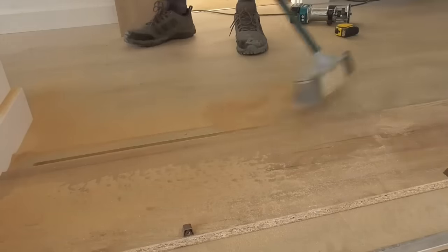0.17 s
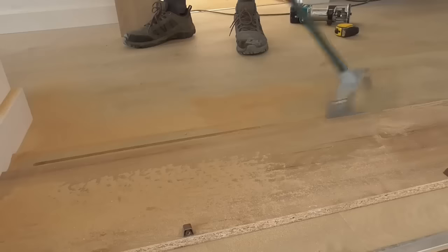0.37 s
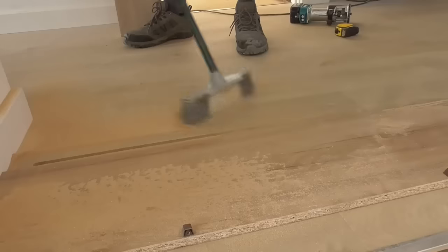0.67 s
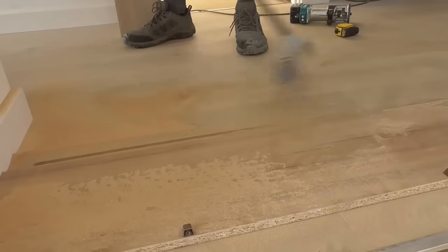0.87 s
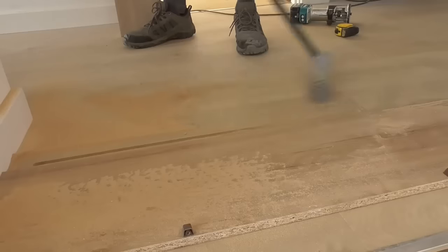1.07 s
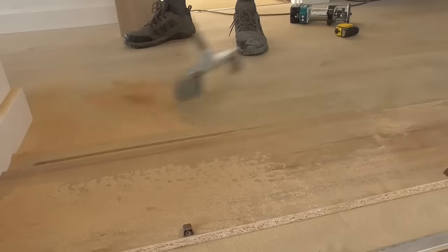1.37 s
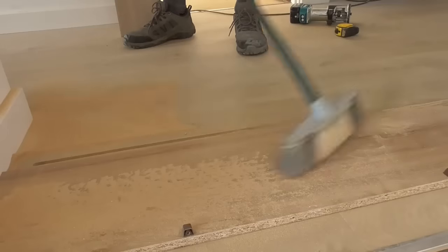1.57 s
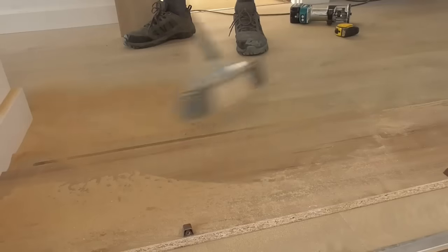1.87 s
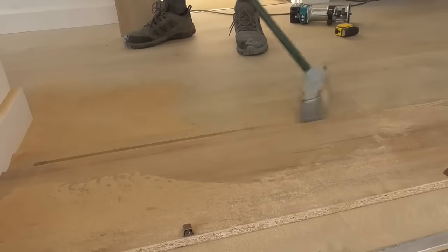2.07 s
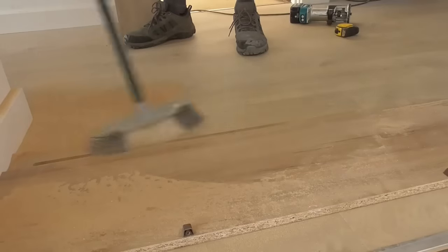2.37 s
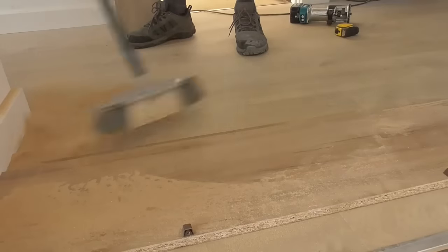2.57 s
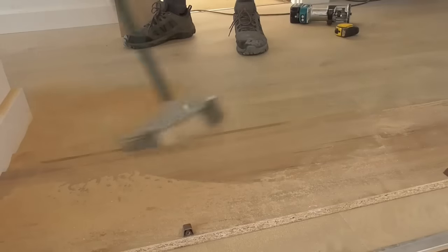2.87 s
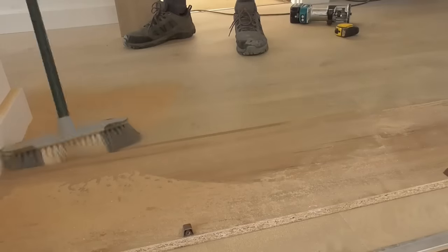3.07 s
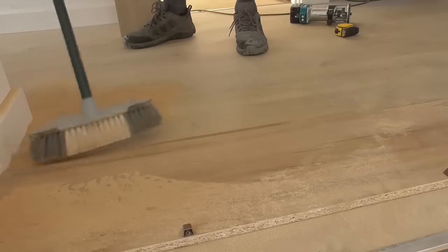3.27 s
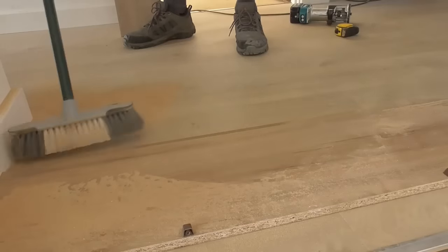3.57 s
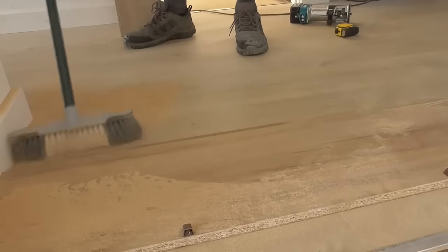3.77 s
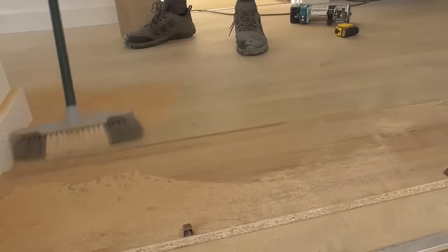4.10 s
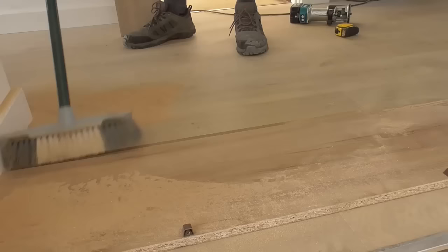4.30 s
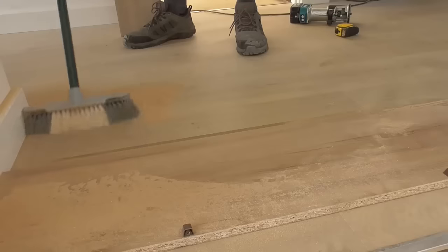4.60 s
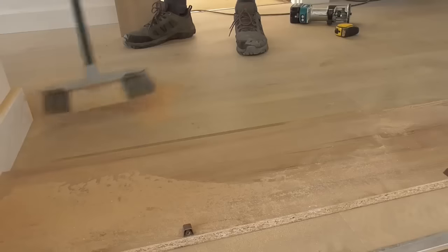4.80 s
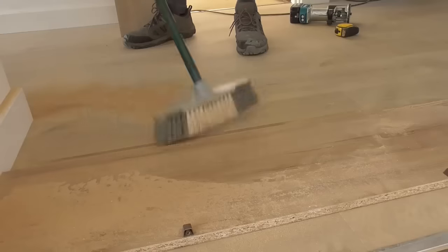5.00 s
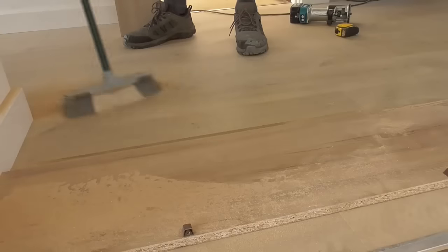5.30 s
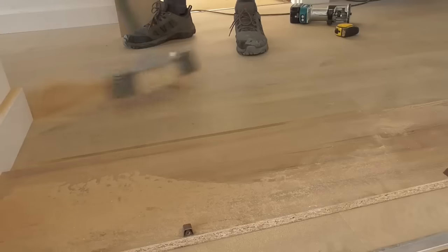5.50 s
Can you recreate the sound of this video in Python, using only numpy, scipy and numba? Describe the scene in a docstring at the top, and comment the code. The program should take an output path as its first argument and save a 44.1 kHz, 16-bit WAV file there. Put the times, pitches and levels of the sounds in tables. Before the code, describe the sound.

In a bare, reverberant room, a stiff broom brushes dust over a hard floor near a stereo microphone. Separate harsh strokes slap down, hiss and lift for three seconds, with faint plank rings. The head then bumps a wooden board several times, hollow and loud, with short drags and bristle ticks between. After a brief gap, one more sweep ends it over very faint house rumble.

```python
"""In a bare, echoing room a stiff brush sweeps dust over a hard floor, close to a small stereo recorder.
Grainy noise makes each stroke land, hiss on and lift; slaps, ticks and plank rings mark the contacts.
The head knocks a hollow wooden board, five times firmly and three times faintly: decaying modes and a crack.
A decaying noise tail makes the room, shaped noise a scuff and the quiet house.
The recorder's limiter ducks at each peak and recovers at a steady rate."""
import sys
import numpy as np
from scipy import signal
from scipy.fft import rfft, irfft
from scipy.io import wavfile
from scipy.ndimage import uniform_filter1d, minimum_filter1d
from numba import njit

SR = 44100
rng = np.random.default_rng(int(sys.argv[2]) if len(sys.argv) > 2 else 0)


def field_ratio(decibels):
    """Amplitude ratio for a level in dB (20 dB per decade); scalars and array-likes work."""
    return 10 ** (np.asarray(decibels, dtype=float) / 20)


def materialize(psi):
    """Save the field psi as 16-bit PCM at rate SR to the path in sys.argv[1].

    A 1-D psi becomes a single channel; in a 2-D psi each row is a channel.
    """
    bounded = np.clip(np.atleast_2d(psi).T, -1, 1)
    quanta = np.round(bounded * 32767).astype(np.int16)
    wavfile.write(sys.argv[1], SR, quanta)


N = 249165  # samples
SIDES = np.array([[1], [-1]])  # sign of a left-right difference in each channel

# brush head against the board: (time [s], blow level [dB], crack over blow [dB])
KNOCKS = [(3.1497, 13.5, -18.5), (3.434, -12.5, -30), (3.4739, 10, -37), (3.8167, 4, -51),
          (4.1177, -18, -29), (4.1567, 17.5, -29), (4.4714, 1, -35), (4.568, -22, -30)]


def unit(x):
    """Scale to an rms of 1."""
    return x / np.sqrt(np.mean(x ** 2))


def fade(t, t60):
    """Exponential decay that falls 60 dB in t60 seconds."""
    return np.exp(-np.log(1000) * t / t60)


def colour(x, points):
    """Shape the spectrum by (Hz, dB) points on a log-frequency axis."""
    hz, db = np.transpose(points)
    f = np.fft.rfftfreq(x.shape[-1], 1 / SR) + 1  # +1 Hz keeps the logarithm finite
    gain_db = np.interp(np.log(f), np.log(hz), db, -120, -120)
    return irfft(rfft(x) * field_ratio(gain_db), x.shape[-1])


def cluster(hz, width, shape):
    """Many close modes at once, as narrow noise: a pitch that wavers and beats; rms 1."""
    peak = [(max(hz - 3 * width, hz / 2), -40), (hz - width / 2, -3), (hz, 0),
            (hz + width / 2, -3), (hz + 3 * width, -40)]
    return unit(colour(rng.standard_normal(shape), peak))


def grains(rate, spread_db):
    """Random one-sample slips, sizes with a long tail, over a bed of noise."""
    size_db = spread_db * np.minimum(rng.exponential(size=N), 5)
    slips = (rng.random(N) < rate / SR) * field_ratio(size_db)
    return rng.standard_normal(N) * np.sqrt(1 + slips ** 2)


def flicker(rate, depth_db):
    """Gain that wanders about `rate` times a second."""
    hold = int(SR / rate)
    steps = np.repeat(rng.standard_normal(N // hold + 1), hold)
    return field_ratio(depth_db * uniform_filter1d(steps, hold)[:N])


def snap(s, db, t60):
    """Short bright noise bursts, each its own, with the given peak levels."""
    t, out = np.arange(1500) / SR, np.zeros(N)
    band = signal.butter(2, [1800, 8500], "band", fs=SR, output="sos")
    bursts = signal.sosfilt(band, rng.standard_normal((len(s), len(t)))) * fade(t, t60)
    for at, size, burst in zip(s, field_ratio(db), bursts):
        start = int(at * SR)
        out[start:start + len(t)] += size * burst / np.abs(burst).max()
    return out


def slope(t, db, db_per_s):
    """Power of four layers that pass db at t = 0 and change steadily."""
    return field_ratio(np.array(db)[:, None] + np.outer(db_per_s, t)) ** 2


def contact():
    """Gains of the layers: pressure settles, speed climbs, the tips lift or the board stops them."""
    # full strokes: (lands [s], lifts [s], pressure at landing [dB], scrape at lift [dB],
    # hiss at lift [dB], fizz at lift [dB], how hard it speeds up [1 = usual])
    strokes = [(-0.2, 0.124, -37.5, -53.5, -54, -59, 0.25), (0.423, 0.762, -39.5, -56, -53, -57.5, 0.46),
               (1.113, 1.35, -41, -53.5, -51.5, -55.5, .7), (1.696, 1.839, -48, -52.5, -44, -48.5, 1.7),
               (2.183, 2.508, -40.5, -50, -48.5, -56, 0.98), (2.821, 3.149, -39.5, -49.5, -40.5, -56, 2.1),
               (5.112, 5.424, -40, -55, -51.5, -54.5, .7)]
    # short pushes that the board stops: (lands [s], stops [s], scrape [dB], hiss [dB], drumming [dB], fizz [dB])
    pushes = [(3.432, 3.474, -40, -58, -32.5, -56), (3.742, 3.771, -35, -51, -38, -56),
              (3.777, 3.821, -46, -52, -44, -65), (4.117, 4.162, -48, -60, -36, -64)]
    # light drags back from the board, levels at lift:
    # (starts [s], lifts [s], scrape [dB], hiss [dB], drumming [dB], fizz [dB])
    drags = [(3.155, 3.2, -61, -67, -58, -78), (3.224, 3.374, -55, -73, -34, -86),
             (3.472, 3.58, -52.5, -57.5, -47, -66), (3.6, 3.673, -59.5, -79, -45, -86),
             (3.825, 3.865, -50.5, -56, -53, -57), (3.9, 3.975, -61, -77.5, -50, -88),
             (4.191, 4.268, -44, -49, -33, -51), (4.297, 4.38, -59, -71, -38.5, -78),
             (4.482, 4.556, -51.5, -57.5, -50, -63), (4.563, 4.657, -63, -58.5, -48.5, -56),
             (4.648, 4.742, -55.5, -53, -56.5, -55)]
    # the bristle row slaps down, bounces or flicks: (time [s], scrape [dB], hiss over scrape [dB],
    # drumming over scrape [dB], t60 [s])
    slaps = [(0.285, -63, -3, 11, 0.36), (0.299, -61, -5, 7.5, 0.22), (0.423, -33.5, -12, -1.5, .07),
             (0.446, -43.5, -14, 7, .1), (0.49, -51, 4, 12.5, 0.17), (0.862, -67, 3, -14, .1),
             (0.9635, -73, 12.5, -2, 0.18), (1.02, -67, 7, 1, 0.11), (1.052, -64, 5, -20, 0.092),
             (1.117, -29.5, -14.5, 2, .07), (1.146, -40, -26, -6, 0.13), (1.549, -57.5, -5, -24, .25),
             (1.695, -27, -8.5, -7.5, 0.056), (2.182, -34.5, -13.5, 1.5, 0.065),
             (2.2, -30.5, -24, 3, 0.076), (2.227, -42.5, -9, 8.5, 0.069), (2.48, -48.5, 0.5, -6, 0.25),
             (2.828, -36, -7, 1.5, 0.15), (2.9, -52, -11, 13, 0.11), (3.434, -33, -17.5, 5, 0.063),
             (3.762, -35, -7, 2.5, .07), (4.117, -38.5, -18, 0, .07), (4.145, -44.5, -2, 5.5, 0.084),
             (4.488, -39.5, -13.5, 5, 0.13), (5.113, -45, 0.5, 9, .1), (5.158, -43.5, -21, -5, .1),
             (5.44, -51, -2.5, -4.5, .1)]
    # the fours below are in the order scrape, hiss, drumming, fizz
    landing_db = np.array((0.5, -17, 3, -40))  # over the pressure at landing
    settle_db_per_s = (86.6, 120, 92, 100)  # the pressure eases
    climb_db_per_s = np.array((2, 13, -15, 6))  # with speed towards the lift; drumming falls
    lift_db_per_s = (75, 140, 61.3, 170)  # tips leave the floor
    drag_swell_db_per_s, drag_lift_db_per_s = (10, 76, 6.8, 140), (74, 124, 70, 200)
    push_sag_db_per_s = 74

    t, power = np.arange(N) / SR, np.zeros((4, N))
    for lands, lifts, press_db, scrape_db, hiss_db, fizz_db, hurry in strokes:
        at_lift = (scrape_db, hiss_db, scrape_db - 5.5, fizz_db)
        on = (t >= lands) & (t < lifts)
        power[:, on] += slope(lands - t[on], press_db + landing_db, settle_db_per_s)
        power[:, on] += slope(t[on] - lifts, at_lift, hurry * climb_db_per_s)
        # a stroke that ends in a knock stops dead
        free = np.abs(lifts - np.array(KNOCKS)[:, 0]).min() > 0.01
        off = (t >= lifts) & (t < lifts + 0.5) & free
        power[:, off] += slope(lifts - t[off], at_lift, lift_db_per_s)
    for lands, stops, *db in pushes:
        on = (t >= lands) & (t < stops)
        power[:, on] += slope(lands - t[on], db, np.full(4, push_sag_db_per_s))
    for starts, lifts, *db in drags:
        on = (t >= starts) & (t < lifts)
        off = (t >= lifts) & (t < lifts + 0.4)
        power[:, on] += slope(t[on] - lifts, db, drag_swell_db_per_s)
        power[:, off] += slope(lifts - t[off], db, drag_lift_db_per_s)
    for s, scrape_db, hiss_db, drum_db, t60 in slaps:
        on = (t >= s) & (t < s + t60)
        slap_db = scrape_db + np.array([0, hiss_db, drum_db, hiss_db - 10])  # fizz 10 dB under the hiss
        power[:, on] += slope(s - t[on], slap_db, np.full(4, 60 / t60))
    return np.sqrt(power)


def brush():
    """Bristle tips slip and catch; each ear hears the fine hiss from other bristles."""
    # spectra of the four layers: (frequency [Hz], level [dB per Hz])
    scrape_points = [(880, -6), (1500, 0), (1790, -8), (2240, -4), (2510, -5.5), (2990, -3.5), (3290, 0),
                     (3870, 2), (5810, -10.5), (7000, -11.5), (9100, -16.5), (15400, -120)]
    hiss_points = [(2940, -16.5), (5000, -4.5), (6040, -5.5), (9530, 0), (11500, -7), (15000, -27),
                   (22000, -120)]
    drum_points = [(24, -88), (40, -33), (97, -9), (126, -22.5), (216, -8.5), (365, -0.5), (416, 2.5),
                   (636, -2), (787, -1), (840, -5), (1090, -4), (1730, -18.5), (2000, -13), (2600, -17.5),
                   (4400, -120)]
    fizz_points = [(6760, -13), (11500, 0.5), (14900, -4.5), (15600, -4), (16000, -14)]
    scrape, hiss, drum, fizz = contact()
    # (gain, spectrum, slips per second, stereo width, flicker rate [Hz])
    layers = ((scrape, scrape_points, 500, 0.55, 60), (hiss, hiss_points, 1500, 0.9, 30),
              (fizz, fizz_points, 1500, 0.9, 30), (drum, drum_points, 120, 0.5, 45))
    out = 0
    for gain, points, rate, width, wobble in layers:
        mid, side = (unit(colour(grains(rate, spread_db=3.5), points)) for _ in range(2))
        # the row of bristles touches down within about two milliseconds
        gain = uniform_filter1d(gain, 90) * flicker(wobble, depth_db=2.0)
        out = out + gain * (mid + width * side * SIDES)
    t = np.arange(N) / SR
    at_board = (t > 3.15) & (t < 4.5)
    pan_db = np.where(at_board, 0.4, -0.55)  # left minus right
    return out * field_ratio(np.array([pan_db, -pan_db]) / 2)


def landings():
    """The head comes down; the plank under it rings over a low thud that spreads through the floor."""
    # (time [s], level [dB], plank pitch [Hz], upper ring [Hz], t60 of the plank pitch [s], low thud over ring [dB])
    planks = [(0.427, -31, 464, 790, 0.34, -22), (1.116, -35.5, 351, 590, 0.65, -12.5),
              (1.695, -36.5, 275, 700, 0.27, -24.5), (2.185, -33, 429, 820, 0.3, -21),
              (2.823, -44.5, 430, 710, 0.54, -1.5), (5.116, -38, 440, 836, 0.33, -10)]
    t, out = np.arange(SR) / SR, np.zeros((2, N + SR))
    for s, db, hz, upper_hz, t60, thud_db in planks:
        main = cluster(hz, 29.4, (2, SR)) * fade(t, t60)
        upper = field_ratio(-3.5) * cluster(upper_hz, 55, (2, SR)) * fade(t, 0.23)
        mid, side = main + upper
        low, wide = field_ratio(thud_db) * cluster(157, 34, (2, SR)) * fade(t, 0.38)
        ring = mid + low + (0.24 * side + 0.5 * wide) * SIDES
        start = int(s * SR)
        out[:, start:start + SR] += field_ratio(db) * ring * (1 - np.exp(-t / 0.0022))  # soft onset
    return out[:, :N]


def ticks():
    """Grit and single bristles snap: tiny bright bursts."""
    # (time [s], peak level [dB])
    tick_table = [(0.3044, -54), (0.9643, -48), (1.0194, -50), (1.0525, -63), (1.1189, -54), (1.5494, -54),
                  (1.6955, -41), (2.2014, -52), (2.8265, -42), (3.7614, -34), (4.49, -27.5)]
    return snap(*np.transpose(tick_table), t60=0.0046)


def knocks():
    """A short hard push rings the board's modes under a crack; so small a board radiates little bass."""
    # board modes: (frequency [Hz], level before blow and swing [dB], t60 [s],
    # signed swing [factor, + is toward], arrival at the left after the right [ms])
    modes = [(87.6, -22.5, 0.084, 0.95, 2.2), (141, -26.5, 0.079, 1, 2.8), (275, -8.5, 0.073, -1.1, 0.044),
             (335.6, -11, 0.05, -0.92, 0.24), (418, -11.5, 0.036, 0.75, 0.17),
             (476.6, -4, 0.038, 0.98, 0.1), (563.6, -14.5, 0.12, 0.47, 0.49),
             (790, -14.5, 0.017, -1.7, 0.071), (1080, -6, 0.011, -0.57, 0.063),
             (1228, -17, 0.047, -0.15, 0.12), (2070, -16, 0.011, -0.31, 0.028),
             (2840, -20.5, 0.0056, -0.56, 0.038), (3880, -19.5, 0.015, -0.17, 0.027)]
    t, blow = np.arange(SR // 4) / SR, np.zeros((2, N))
    chances = rng.standard_normal((len(KNOCKS), len(modes)))
    for (s, blow_db, _), chance in zip(KNOCKS, chances):
        start = int(s * SR)
        for (hz, mode_db, t60, swing, lag_ms), c in zip(modes, chance):
            # each mode sounds from its own stretch of the long board
            late = np.maximum(t - np.array([[abs(lag_ms) / 1000], [0]]), 0)
            # the head never meets quite the same spot: 1.5 dB of scatter
            size = swing * field_ratio(blow_db + mode_db + 1.5 * c)
            blow[:, start:start + len(t)] += size * np.sin(2 * np.pi * hz * late) * fade(late, t60)
    bass_cut = signal.butter(2, 170, "high", fs=SR, output="sos")
    blow = signal.sosfilt(bass_cut, uniform_filter1d(blow, size=3))
    s, blow_db, crack_db = np.transpose(KNOCKS)
    return blow + snap(s, blow_db + crack_db, t60=0.0037)


def scuff():
    """A dull, coloured scuff, perhaps a shoe shifting: rubbing noise through a few fixed resonances."""
    # loudness curve: (time [s], level [dB])
    swell = [(2.38, -66), (2.42, -61.5), (2.5, -59.5), (2.62, -65), (2.72, -59), (2.8, -59), (2.83, -64)]
    # resonances: (frequency [Hz], width [Hz], level [dB])
    rings = [(686, 96, 1.5), (865, 110, -0.5), (1257, 120, -2), (2460, 290, -8.5)]
    mid, side = sum(field_ratio(db) * cluster(hz, width, (2, N)) for hz, width, db in rings)
    level_db = np.interp(np.arange(N) / SR, *np.transpose(swell), -120, -120)
    return field_ratio(level_db) * (mid + 0.4 * side * SIDES)


def room(x):
    """Bare walls: a tail that fades at its own rate in each band and starts with the first echoes."""
    # broad bands: (centre [Hz], t60 [s], relative level [dB], likeness of left and right [0-1])
    bands = [(61.7, 0.39, -1, 0.7), (151, 0.47, -6.5, 0.7), (275, 1.06, -8.5, 0.76),
             (657, 0.88, -8.5, 0.82), (1256, 0.94, -4, 0.49), (2320, 0.89, -9.5, 0.36), (4610, 1.1, -9, 0),
             (10430, 2.2, -11.5, 0)]
    # crowds of standing waves:
    # (frequency [Hz], width [Hz], relative level [dB], t60 [s], left-right difference [0-1])
    standing = [(83, 26, -30.5, 1.26, 0.2), (158.5, 61, -26, 0.88, 0.3), (278, 35, -34, 0.76, 0.17),
                (310.9, 15.5, -20, 1, 0), (390, 76, -29, 0.97, 0.05), (447, 19, -31, 0.94, 0.15)]
    t, tail = np.arange(int(1.5 * SR)) / SR, 0

    def decay(t60):  # of unit energy
        return fade(t, t60) / np.sqrt(t60 * SR / np.log(1000) / 2)

    for hz, t60, db, alike in bands:
        octave = [(hz / 2, -24), (hz / np.sqrt(2), -3), (hz, 0), (hz * np.sqrt(2), -3), (hz * 2, -24)]
        mid, side = colour(rng.standard_normal((2, len(t))), octave)
        both = np.sqrt(1 + alike) * mid + np.sqrt(1 - alike) * side * SIDES
        tail = tail + field_ratio(db) * both * decay(t60)
    for hz, width, db, t60, unlike in standing:
        mid, side = cluster(hz, width, (2, len(t)))
        tail = tail + field_ratio(db) * (mid + unlike * side * SIDES) * decay(t60)
    # strong echoes arrive in bunches, so the tail comes in lumps
    lumps = flicker(45, depth_db=3.0)[:len(t)]
    # the near walls answer first and loudest
    early = 1 + 0.72 * fade(t, 0.22)
    # silent for 4 ms, then a 6.1 ms rise
    onset = np.clip((t - 0.004) / 0.0061, 0, 1)
    return signal.fftconvolve(x[None], tail * lumps * early * onset, axes=1)[:, :N]


def house():
    """The faint rumble and hiss of the quiet house: steady shaped noise."""
    # (frequency [Hz], level [dB per Hz])
    spectrum = [(15, -47), (25, 0), (249, 2), (545, -5), (1260, -7.5), (1940, -14.5), (3620, -9),
                (6050, -16), (10100, -15.5), (16000, -20)]
    mid, side = unit(colour(rng.standard_normal((2, N)), spectrum))
    return field_ratio(-66) * (mid + 0.73 * side * SIDES)


def scene():
    """Brush and board heard directly, their echo in the room, and the house behind."""
    bristles = brush() + ticks() + landings() + scuff()
    board = knocks()
    panned_board = board * field_ratio([[1.2], [-1.2]])  # a little to the left
    into_room = field_ratio(-8.5) * bristles.mean(0) + field_ratio(-5.0) * board.mean(0)
    return bristles + panned_board + room(into_room) + house()


@njit
def limiter_gain(peak, top, fall):
    """Catch each peak at once, let go at a steady rate in dB."""
    gain, held = np.empty(len(peak)), 0.
    for i in range(len(peak)):
        held = max(peak[i], held * fall)
        gain[i] = min(1., top / (held + 1e-9))
    return gain


def band_limit(x):
    """A steep low-pass at the top of the band."""
    return signal.sosfilt(signal.butter(12, 16470, fs=SR, output="sos"), x)


def record(dry):
    """The recorder: a limiter that looks a millisecond ahead, then a steep cut of the top."""
    limit_db, release_db_per_s, top_hz = -5, 55.5, 16000
    gain = limiter_gain(np.abs(dry).max(0), field_ratio(limit_db), field_ratio(-release_db_per_s / SR))
    gain = uniform_filter1d(minimum_filter1d(gain, 89), 45)  # look ahead, then smooth
    top_cut = signal.ellip(8, 0.2, 70, top_hz, fs=SR, output="sos")
    mix = signal.sosfilt(top_cut, dry * gain)
    return band_limit(mix)


dry = scene()
out = record(dry)
materialize(out)
```